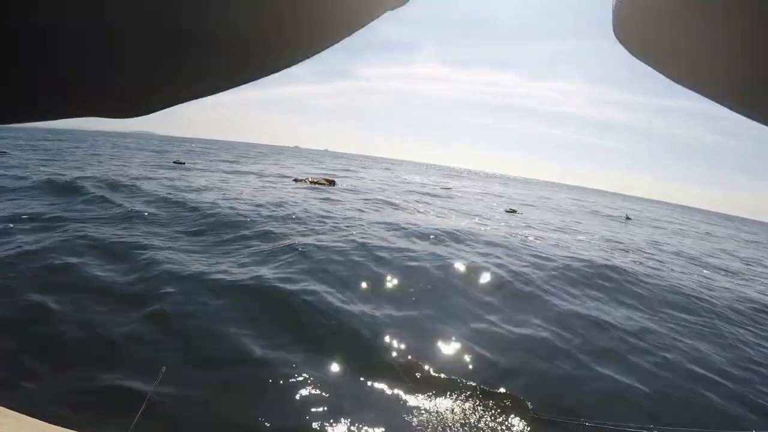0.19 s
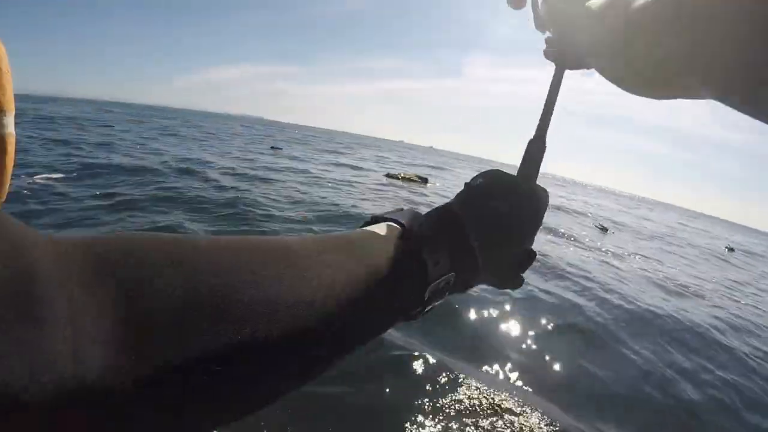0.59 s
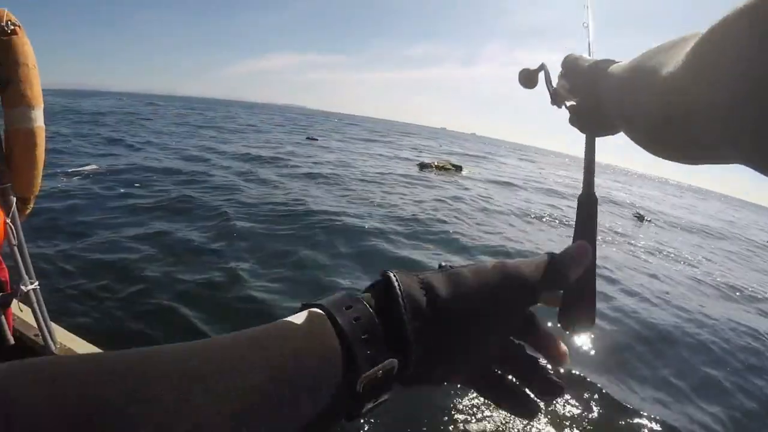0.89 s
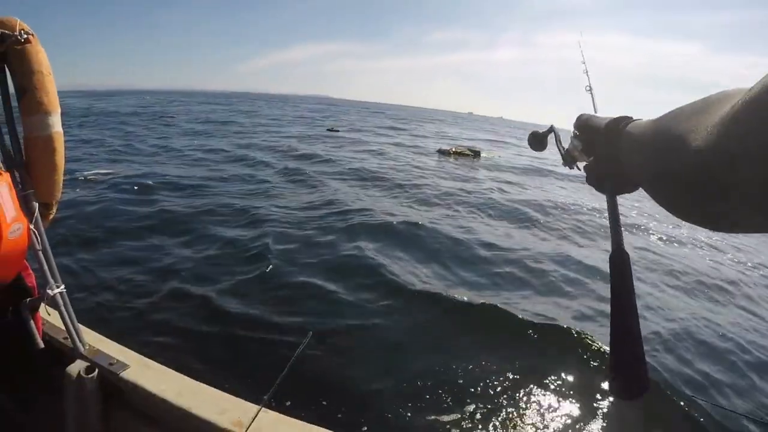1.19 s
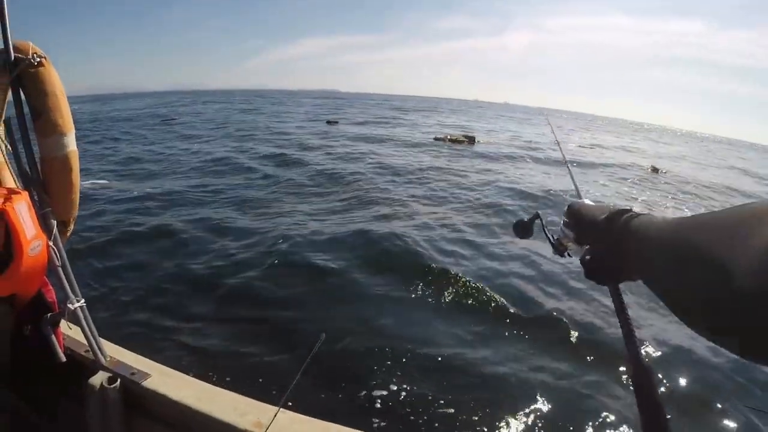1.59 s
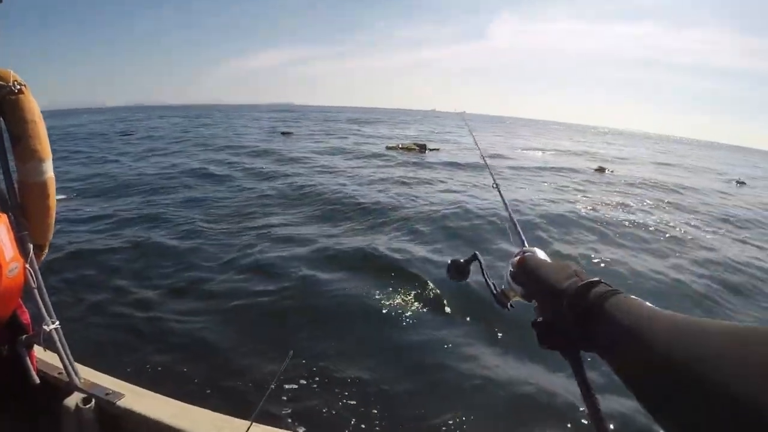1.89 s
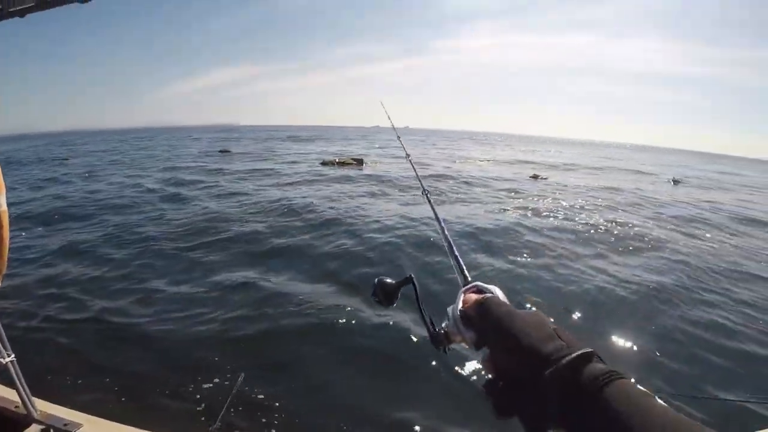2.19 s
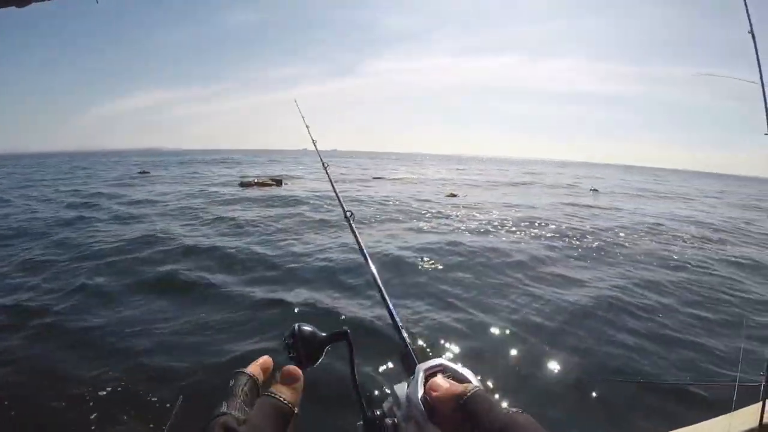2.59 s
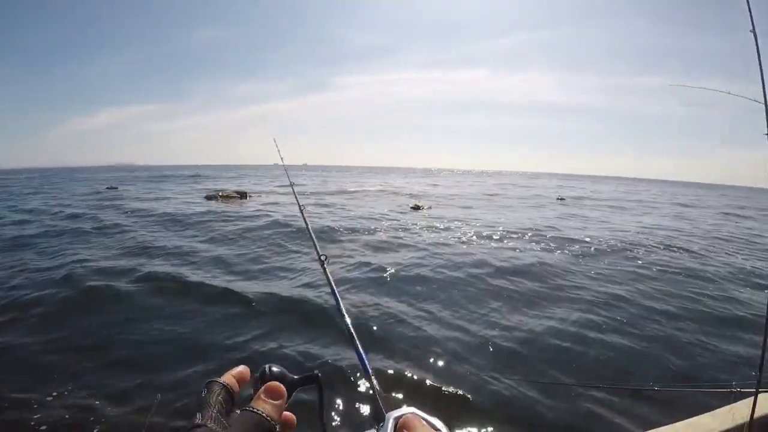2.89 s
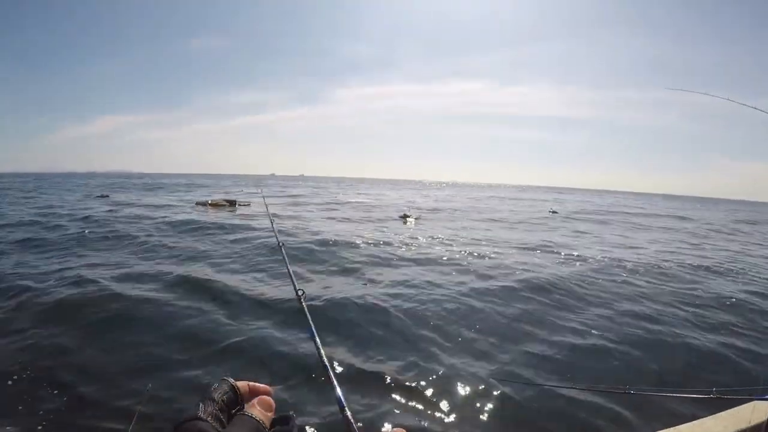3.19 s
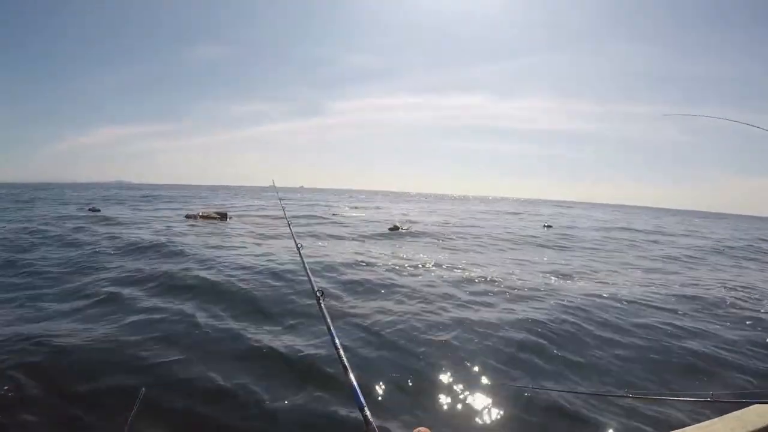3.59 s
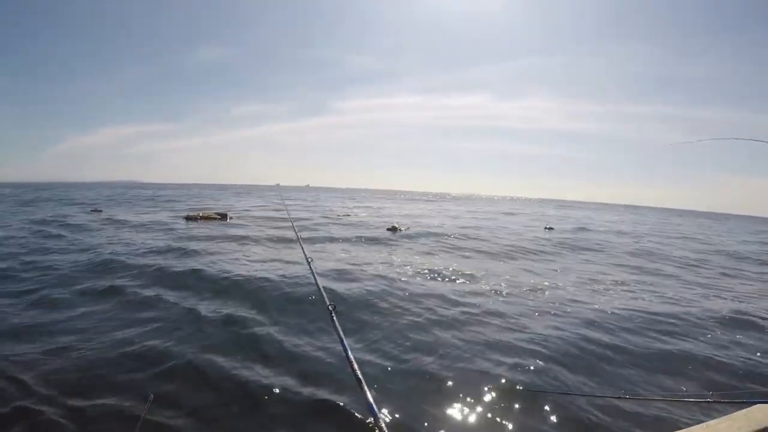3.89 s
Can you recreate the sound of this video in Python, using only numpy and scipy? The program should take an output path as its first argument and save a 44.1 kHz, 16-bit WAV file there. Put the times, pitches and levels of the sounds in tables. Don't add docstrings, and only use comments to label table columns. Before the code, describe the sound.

Body-worn camera bumps and rustles beside snapping rod and reel, with small waves behind.

```python
import sys
import numpy as np
from scipy import signal
from scipy.fft import rfft, irfft
from scipy.io import wavfile
from scipy.ndimage import uniform_filter1d

SR = 44100
rng = np.random.default_rng(int(sys.argv[2]) if len(sys.argv) > 2 else 0)


def magnitude_from_level(level_db):
    exponent = np.asarray(level_db, float) / 20
    return 10 ** exponent


def waveform_to_disk(signal):
    frames = np.transpose(np.atleast_2d(signal))
    scaled = np.clip(frames, -1, 1) * 32767
    samples = np.round(scaled).astype(np.int16)
    wavfile.write(sys.argv[1], SR, samples)


N = 176400

# pitch_hz, left_level_db, right_level_db, right_polarity [+1 or -1]
SHELL_MODES = [
    (156, -15, -13, 1),
    (186, -0.5, 0, 1),
    (232, -0.5, 0, 1),
    (331, 0, -11.5, -1),
    (472, 1, -8, -1),
    (644, -0.5, -6.5, -1),
    (845, -0.5, -1, -1),
    (1103, -1.5, 2, -1),
    (1594, -2.5, -3.5, -1),
    (2340, -0.5, -4, -1),
]
SHELL_T60 = [.2, .028, .022, .02, .035, .018, .02, .025, .012, .007]
MODE_FAMILY = np.array([2, 2, 2, 0, 0, 1, 1, 1, 1, 1])
FIRST_SWING = np.array([-1, -1, -1, 1, -1, -1, -1, -1, -1, -1])[:, None]
# start_s, hollow_level_db, bright_level_db, thud_level_db
KNOCKS = [(0.082, -52, -41, -29.5), (0.2144, -38, -30, -8), (0.341, -46, -25, -27), (0.4413, -19, -9, -28),
          (0.474, -22, -10, -26), (0.5059, -14, -0.5, -17.5), (0.686, -26.5, -14.5, -31),
          (1.3976, -30.5, -21.5, -31.5), (1.507, -17.5, -14, -24.5), (1.5421, -27.5, -20.5, -29.5),
          (1.7145, -27, -21, -32), (2.456, -46, -36, -27.5), (2.5346, -29, -31, -38),
          (2.601, -24.5, -12.5, -30), (2.618, -23.5, -17, -26.5), (2.661, -33, -16, -30),
          (2.702, -24, -17, -24), (2.7823, -21, -5, -28), (2.8772, -59, -3.5, -28),
          (2.9309, -19.5, -2.5, -22.5), (3.0517, -22.5, -1.5, -38), (3.0729, -52, -23, -41),
          (3.117, -23.5, -29, -27), (3.2005, -22, -39, -38), (3.332, -23.5, -30, -60),
          (3.3589, -22, -8.5, -40), (3.422, -29.5, -15, -59), (3.5461, -23, -3, -27.5),
          (3.578, -52, -28, -30), (3.9115, -31.5, -15.5, -39)]
# time_s, level_db, brightness_db
RUB_CURVE = [(0, -62, 14), (.15, -45, 8), (.3, -38, 4.5), (.4, -45.5, 5.5), (.68, -46, 4),
             (1.04, -49, -0.5), (1.47, -50.5, 3.5), (2.15, -47.5, 6), (2.38, -44.5, 5), (2.74, -48.5, 3),
             (2.99, -49, -11), (3.1, -43, 3), (3.13, -38.5, 7), (3.24, -36.5, 9), (3.27, -39.5, 2),
             (3.32, -40.5, 7), (3.4, -53, 2), (4, -56.5, -1)]
# start_s, length_s, level_db
STROKES = [(0.022, 0.063, -44), (0.213, 0.18, -39), (0.39, 0.072, -42), (0.553, 0.045, -40.5),
           (0.605, 0.068, -45.5), (1.685, 0.23, -49), (2.283, 0.115, -40.5), (2.433, 0.074, -38.5),
           (3.103, 0.27, -48), (3.59, 0.033, -66), (3.878, 0.1, -50)]
# pitch_hz, level_db [per Hz]
CLOTH_SPECTRUM = [(300, 0), (800, -5), (1300, 7), (3300, -5), (4700, -12), (7500, -8.5), (11000, -41),
                  (15000, -62)]
SNAP_TIMES = [.215, .379, .3822, .382, .3887, .3909, 2.2005, 2.202, 2.212, 2.2195, 2.444, 2.445, 2.929,
              3.2408, 3.2438, 3.2452, 3.2488, 3.72, 3.721, 3.72]
# level_db, centre_octaves [over 1 kHz], t60_s, rise_ms, band_damping [ratio]
SNAPS = [(-11, 0.2, 0.047, 0.81, .9), (-22, 1.6, .03, 2, .6), (-13, 1.9, 0.044, .5, .5),
         (-27, 3.4, .05, .4, 1.1), (-3.5, 1.75, 0.008, .3, 1.2), (-9, 1.5, 0.012, .3, .8),
         (-11, 1.6, 0.085, .45, .95), (-12.5, -.3, 0.12, 1.2, 1.3), (-18, 1.2, .05, .4, .8),
         (-19, 1.4, .04, .4, .8), (-22.5, 1.9, 0.084, 1.5, 1.1), (-19, .65, 0.018, 0.76, .6),
         (-23.5, 1.93, 0.064, 0.8, 1.2), (-12, 1.0, 0.012, .5, 1.2), (-8, 2.2, 0.008, 0.3, 1.4),
         (-9, 2.2, .008, .3, 1.0), (-16, 0.85, 0.025, 0.35, .8), (-22, 1.6, 0.11, 3.5, .4),
         (-20.5, .3, 0.09, 5, .55), (-31, 3, .06, 1.8, .7)]
# pitch_hz, width_hz, level_db
GEAR_RESONANCES = [(1800, 140, 12.5), (2300, 170, -1), (2580, 150, 12), (3370, 150, 11), (3900, 140, 7.5),
                   (5390, 150, 12.5), (7620, 350, 11)]
# start_s, peak_level_db, centre_octaves [over 1 kHz], left_right_db
TICKS = [(0.1168, -32, 2.4, 12), (.2164, -25, 2.3, 2), (0.5088, -32.5, 3, -6.5), (0.5126, -29, 4.3, -5.5),
         (.5472, -42, 1.4, 1), (.56, -45, 2.4, -1), (0.578, -36, 2.9, -3), (.599, -37, 3, -5),
         (.635, -38, 2, 0), (1.1402, -36, 6.9, -10), (1.3294, -42, 3.8, -6), (1.3667, -37, 3.3, -10),
         (1.7796, -24.5, 1.5, 2), (1.9643, -32.5, 2, 2), (2.01, -35, 1.4, -3.5), (2.7551, -38, 1, 3),
         (2.904, -45, 1, 2), (3.3953, -37, 2.5, -1.5), (3.422, -41, 1.9, -4)]
# time_s, level_db
WATER_CURVE = [(0.0, -47.5), (0.38, -41.5), (0.69, -52), (1.65, -51.5), (1.8, -49), (2.42, -50),
               (2.73, -53.5), (4.0, -50.5)]
# pitch_hz, level_db [per Hz]
WASH_SPECTRUM = [(59, -66), (100, -2.5), (370, -7.5), (727, -21.5), (1110, -7), (4370, -25.5), (8770, -23),
                 (13400, -41), (15500, -39)]
# pitch_hz, correlation [-1 to 1]
PORT_LIKENESS = [(150, 0.17), (500, 0.0064), (1500, -0.33), (4400, 0.38), (9000, -0.06)]
# pitch_hz, left_right_db
PORT_LEAN = [(200, 1), (2400, -2.5), (4400, -0.5), (8000, -5.5), (15000, -3.5)]
# time_s, level_db
WIND_CURVE = [(0.0, -75), (0.48, -33), (0.54, -31), (0.71, -51), (0.8, -44.5), (0.87, -37.5), (0.97, -44),
              (0.99, -39), (1.17, -42), (1.21, -49), (1.37, -41.5), (1.45, -48.5), (2.58, -60), (2.61, -49),
              (2.65, -62), (3.39, -61), (3.41, -70), (4.0, -68)]
# pitch_hz, level_db [per Hz]
GUST_SPECTRUM = [(8, 9.5), (25, 11.5), (45, -3), (80, 0.5), (115, -8.5), (200, -69)]


def evened(x):
    return x / np.sqrt(np.mean(x ** 2) + 1e-20)


def read(points, hz):
    f, value = np.transpose(points)
    return np.interp(np.log(hz + 1), np.log(f + 1), value)


def follow(curve, column=1):
    rows = np.transpose(curve)
    return magnitude_from_level(np.interp(np.arange(N) / SR, rows[0], rows[column]))


def add(mix, start_s, sound):
    part = mix[:, round(start_s * SR):][:, :sound.shape[1]]
    part += sound[:, :part.shape[1]]


def shell_ring(pad_hz):
    t = np.arange(6000) / SR
    hz, left_db, right_db, polarity = np.transpose(SHELL_MODES)[..., None]
    decay = magnitude_from_level(-60 * t / np.array(SHELL_T60)[:, None])
    swing_up = (1 - np.exp(-t * hz / 0.2)) ** 2
    ring = FIRST_SWING * decay * np.sin(2 * np.pi * hz * t) * swing_up
    ring = signal.lfilter(*signal.butter(3, pad_hz, fs=SR), ring)
    return np.array([magnitude_from_level(left_db) * ring, polarity * magnitude_from_level(right_db) * ring])


def knocks():
    family_db = [6.5, -6, 3.5]
    spread_db, bounce_s, bounce_db = 1.2, 0.00397, -9.5
    out = np.zeros((2, N))
    luck = rng.standard_normal((len(KNOCKS), len(SHELL_MODES) + 1))
    rings = shell_ring(pad_hz=1720)
    for (start_s, *levels_db), chance in zip(KNOCKS, luck):
        mode_db = np.add(levels_db, family_db)[MODE_FAMILY] + spread_db * chance[1:]
        ring = (rings * magnitude_from_level(mode_db)[:, None]).sum(1)
        add(out, start_s, ring)
        add(out, start_s + bounce_s * (1 + 0.217 * chance[0]), -magnitude_from_level(bounce_db) * ring)
    return out


def rubbing():
    kicks_per_s, spread_db = 8000, 3.5
    family_db = [3, 5.5, -3.5]
    kicks = magnitude_from_level(spread_db * np.minimum(rng.exponential(1, N), 4))
    kicks *= rng.random(N) < kicks_per_s / SR
    kicks *= rng.choice([-1, 1], N)
    struck = rng.integers(0, len(SHELL_MODES), N)
    rings = shell_ring(pad_hz=2350)
    families = np.zeros((3, 2, N))
    for mode, family in enumerate(MODE_FAMILY):
        mode_kicks = (kicks * (struck == mode))[None]
        families[family] += signal.oaconvolve(mode_kicks, rings[:, mode], axes=1)[:, :N]
    hollow, bright, thud = [magnitude_from_level(db) * evened(x) for db, x in zip(family_db, families)]
    return follow(RUB_CURVE) * (hollow + follow(RUB_CURVE, column=2) * bright + thud)


def port_noise(spectrum, likeness, lean_db, patch_db, flicker_db, size):
    frames, hz = 4 * N // size + 5, np.fft.rfftfreq(size, 1 / SR)
    a, b, c, d, patches = rng.standard_normal((frames, len(hz), 5)).T
    patches = uniform_filter1d(patches, size=8, axis=0)
    patches = evened(uniform_filter1d(patches, size=14, axis=1))
    flicker = evened(uniform_filter1d(rng.standard_normal(frames), size=4))
    same = np.clip(likeness(hz), -1, 1)[:, None]
    left = a + 1j * b
    right = same * left + np.sqrt(1 - same ** 2) * (c + 1j * d)
    z = np.array([left * magnitude_from_level(lean_db(hz))[:, None], right])
    z *= magnitude_from_level(read(spectrum, hz)[:, None] + patch_db * patches + flicker_db * flicker)
    return evened(signal.istft(z, nperseg=size, noverlap=3 * size // 4)[1][:, :N])


def diffuse_noise(spectrum, patch_db, flicker_db, size):
    return port_noise(spectrum, lambda hz: read(PORT_LIKENESS, hz), lambda hz: read(PORT_LEAN, hz),
                      patch_db, flicker_db, size)


def sleeves():
    rise_share, stop_s, level_db = 0.18, 0.019, 3.5
    t, env = np.arange(N) / SR, np.zeros(N)
    for start_s, length_s, db in STROKES:
        swell = np.clip((t - start_s) / (rise_share * length_s), 0, 1)
        stop = np.clip(1 + (start_s + length_s - t) / stop_s, 0, 1)
        env += magnitude_from_level(db) * swell * stop
    cloth = diffuse_noise(CLOTH_SPECTRUM, patch_db=1.6, flicker_db=1.6, size=256)
    return magnitude_from_level(level_db) * env * cloth


def snaps():
    wide, ring_db, top_hz = 0.87, -1, 11200
    tail_db, deck_t60, metal_t60 = -36.5, 0.2, 0.045
    out, t = np.zeros((2, N)), np.arange(8192) / SR
    hz = np.fft.rfftfreq(len(t), 1 / SR) + 1
    rings = sum(magnitude_from_level(db) / (1 + 2j * (hz - f) / (2 * width)) for f, width, db in GEAR_RESONANCES)
    lean = np.array([magnitude_from_level(read(PORT_LEAN, hz)), np.ones(len(hz))])
    for start_s, (db, octave, t60, rise_ms, damping) in zip(SNAP_TIMES, SNAPS):
        crackle = 0.12 + rng.exponential(1, len(t))
        centre, left, right = rng.standard_normal((3, len(t))) * crackle
        rise = 1 - np.exp(-(t * 1e3 / rise_ms) ** 2)
        env = rise * (magnitude_from_level(-60 * t / t60) + magnitude_from_level(tail_db - 60 * t / deck_t60))
        burst = env * np.array([centre + wide * left, centre + wide * right])
        band = 1j * hz / (1e3 * 2 ** octave)
        colour = 0.5 + magnitude_from_level(ring_db) * rings * (t60 < metal_t60)
        colour = colour * (band / (1 + damping * band + band ** 2)) ** 1.28
        colour = colour / (1 + 1j * hz / top_hz) ** 3
        x = irfft(rfft(burst) * colour * lean)
        add(out, start_s, x / np.std(x[:, :1024]) * magnitude_from_level(db) / 6)
    return out


def ticks():
    t60, damping, level_db, wide, top_hz = 0.0066, 1.9, 2.5, 0.33, 9100
    out, t = np.zeros((2, N)), np.arange(1024) / SR
    hz = np.fft.rfftfreq(len(t), 1 / SR)
    for start_s, db, octave, pan_db in TICKS:
        centre, left, right = rng.standard_normal((3, len(t)))
        x = magnitude_from_level(-60 * t / t60) * np.array([centre + wide * left, centre + wide * right])
        band = 1j * hz / (1e3 * 2 ** octave)
        colour = (band / (1 + damping * band + band ** 2)) ** 2 / (1 + 1j * hz / top_hz) ** 3
        x = irfft(rfft(x) * colour)
        port_db = db + level_db + np.array([[0.5], [-0.5]]) * pan_db
        add(out, start_s, x / abs(x).max(1)[:, None] * magnitude_from_level(port_db))
    return out


def water():
    wash = diffuse_noise(WASH_SPECTRUM, patch_db=1.46, flicker_db=1.5, size=512)
    return magnitude_from_level(9) * follow(WATER_CURVE) * wash


def wind():
    gusts = port_noise(GUST_SPECTRUM, lambda hz: 0.91 + 0 * hz, lambda hz: 0 * hz,
                       patch_db=0.34, flicker_db=1.7, size=4096)
    return magnitude_from_level(4.5) * follow(WIND_CURVE) * gusts


def scene():
    cut = signal.butter(6, 142.7, "high", fs=SR, output="sos")
    shell = knocks() + rubbing() + sleeves()
    gear = snaps() + ticks()
    return signal.sosfilt(cut, shell + gear + water()) + wind()


def top_cut(x):
    return signal.sosfilt(signal.butter(12, 15600, fs=SR, output="sos"), x)


def record(dry):
    top = signal.butter(7, 14400, fs=SR, output="sos")
    return top_cut(signal.sosfilt(top, dry))


dry = scene()
out = record(dry)
waveform_to_disk(out)
```